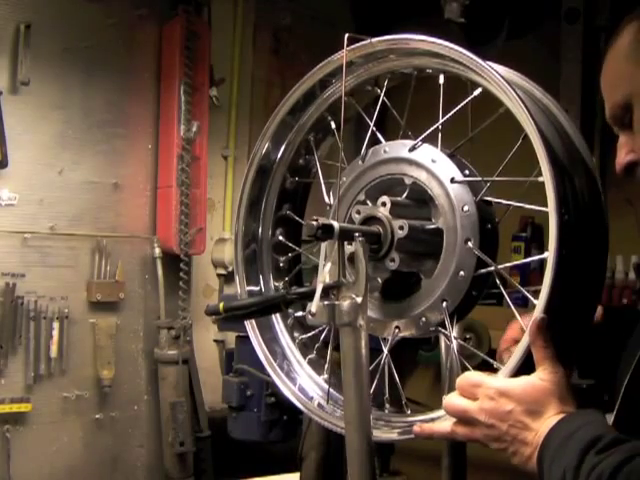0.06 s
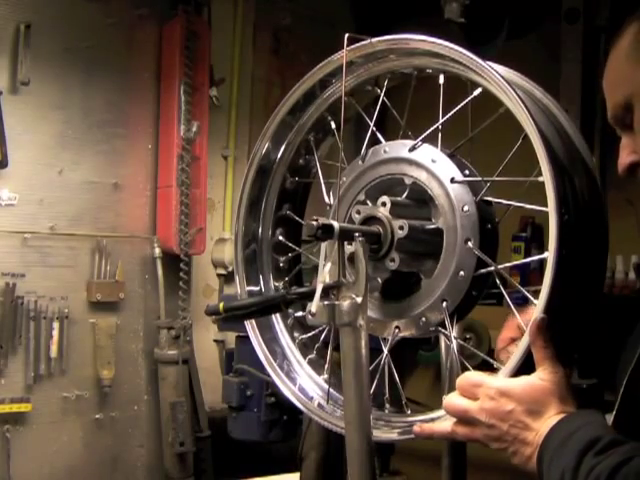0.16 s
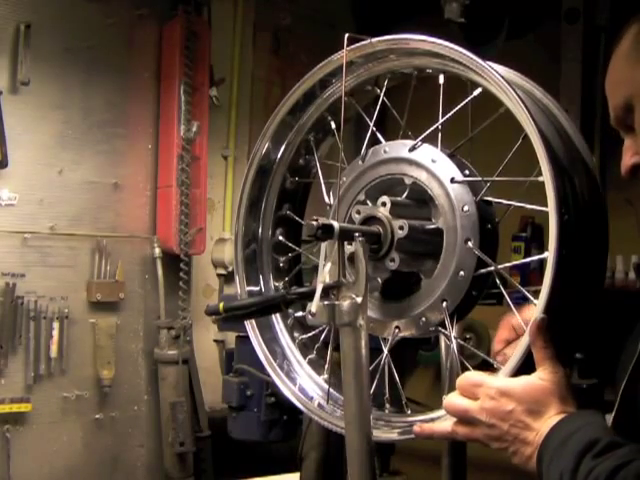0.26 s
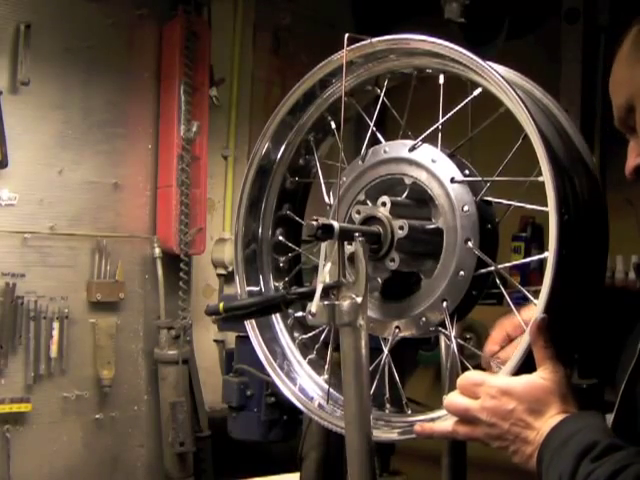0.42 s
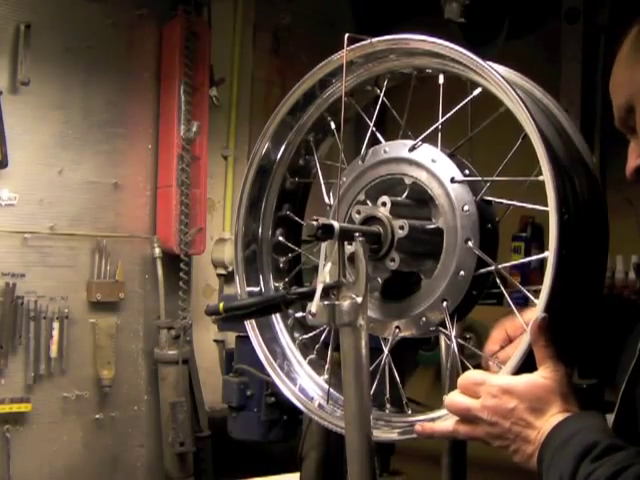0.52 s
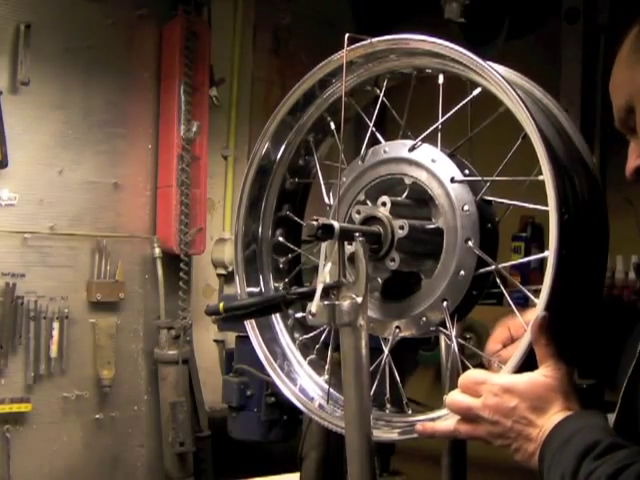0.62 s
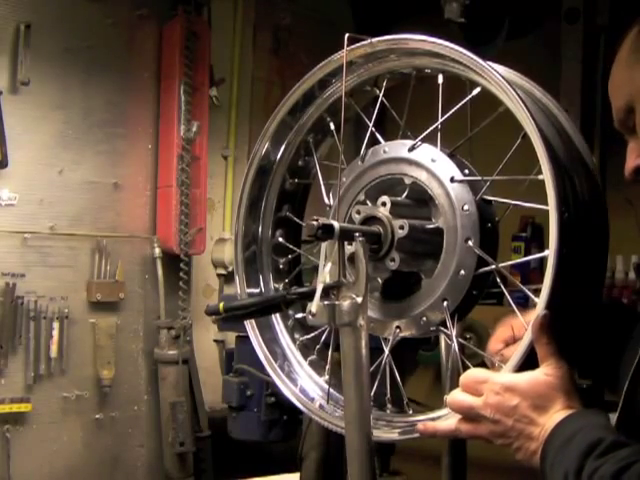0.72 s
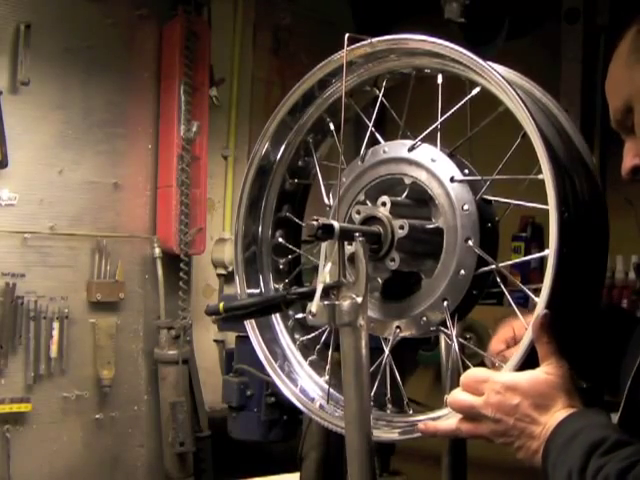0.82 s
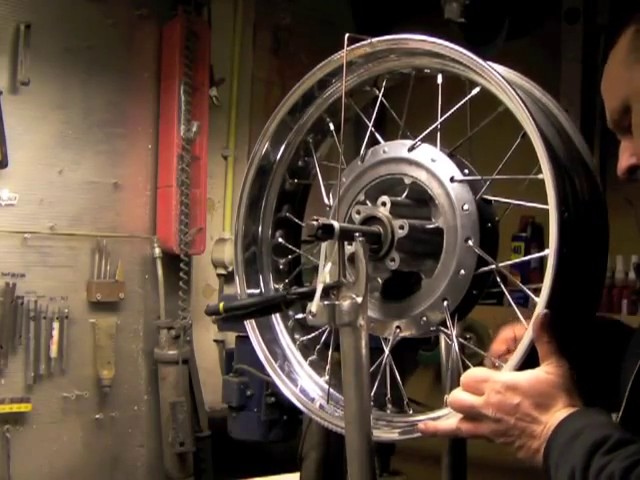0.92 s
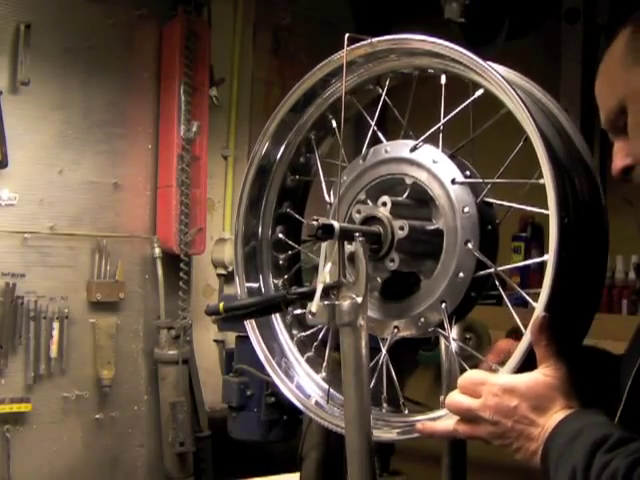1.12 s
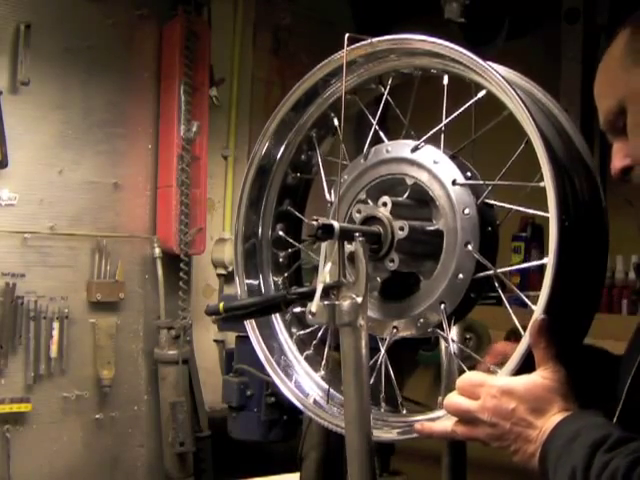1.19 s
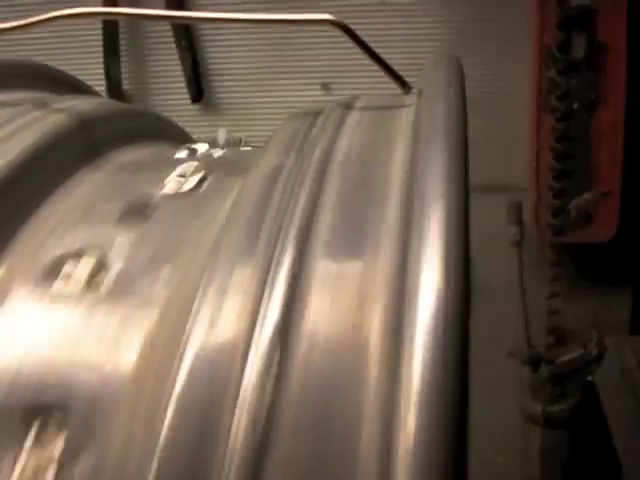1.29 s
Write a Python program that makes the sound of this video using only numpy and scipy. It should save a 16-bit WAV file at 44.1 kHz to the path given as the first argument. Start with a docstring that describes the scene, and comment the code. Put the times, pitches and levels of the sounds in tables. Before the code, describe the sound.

Small steel wrench knocks hard on a metal wheel rim, then rattles lightly against the spokes

```python
"""A quiet workshop where a wire wheel is trued: a small steel wrench knocks hard on the rim once and
rattles lightly on the spokes. Blows ring decaying modes of wrench and wheel; dense modes and contact
are decaying noise bands. A wall clock ticks once a second; the room reverberates and hums over
lumpy bass from outside. Near the end the sound fades out and begins to fade in again."""
import sys
import numpy as np
from scipy import signal
from scipy.fft import rfft, irfft, next_fast_len
from scipy.io import wavfile

SR = 44100
rng = np.random.default_rng(int(sys.argv[2]) if len(sys.argv) > 2 else 0)


def log_audio(samples):
    """Write samples as a 16-bit WAV file to the path given in sys.argv[1]."""
    # one column per channel
    frames = np.atleast_2d(samples).T
    # limit to full scale, then quantise
    limited = np.clip(frames, -1, 1)
    pcm = np.round(limited * 32767).astype(np.int16)
    wavfile.write(sys.argv[1], SR, pcm)


def ratio_of_db(decibels):
    """Turn decibels (scalar or array-like) into linear amplitude factors; 0 dB maps to 1."""
    return 10 ** (np.asarray(decibels, float) / 20)


N = 59535

# left-right phase difference of modes and noise bands: f/Hz, phase/rad
PHASE_APART = [(1000, .15), (2500, 0.17), (5000, 0.54), (9000, 1.3), (14000, 1.5)]


def rms_one(x):
    """Scale to unit rms."""
    return x / np.sqrt(np.mean(x ** 2) + 1e-20)


def at_hz(points, hz):
    """Interpolate a table on a log-frequency axis."""
    table_hz, values = np.transpose(points)
    return np.interp(np.log(hz), np.log(table_hz), values)


def drift(rate_hz):
    """Slow random wander of unit rms: noise through a double pole, at SR / 40."""
    pole = np.exp(-80 * np.pi * rate_hz / SR)
    noise = rng.standard_normal(N // 40 + 2002)
    slow = signal.lfilter([1], [1, -2 * pole, pole * pole], noise)[2000:]   # skip the settling
    return np.interp(np.arange(N) / 40, np.arange(len(slow)), rms_one(slow))


def dying(start_s, t60_s):
    """Silence, then an exponential decay from 1."""
    t = np.arange(N) / SR - start_s
    return (t >= 0) * ratio_of_db(-60 * np.maximum(t, 0) / t60_s)


def strike(modes, times_s, levels_db, contact_s, spread_db):
    """Pulses drive each decaying mode at its own pitch, the drive dying with time constant contact_s."""
    # left minus right level of a mode: f/Hz, level/dB
    side_balance = [(60, -0.5), (130, -2.0), (290, -0.5), (640, 3.5), (1410, 0), (3100, 1.5), (6820, 0.5),
                    (15000, -6)]
    out = np.zeros((2, N))
    hold = np.exp(-1 / (contact_s * SR))
    at = (np.asarray(times_s) * SR).astype(int)
    start = at.min()
    sides = np.array([[.5], [-.5]])
    for hz, db, t60_s in modes:
        end = min(N, at.max() + int(1.5 * t60_s * SR))
        clicks = np.zeros(end - start) + 1e-18
        uneven_db = spread_db * rng.standard_normal(len(at))
        clicks[at - start] = ratio_of_db(np.asarray(levels_db) + db + uneven_db)
        turn = np.exp(2j * np.pi * hz / SR)
        drive = signal.lfilter([1 - hold], [1, -hold * turn], clicks)
        rung = signal.lfilter([1], [1, -ratio_of_db(-60 / (t60_s * SR)) * turn], drive)
        gain = ratio_of_db(at_hz(side_balance, hz) * sides)
        phase = sides * at_hz(PHASE_APART, hz) * rng.choice([-1, 1])
        out[:, start:end] += (rung * gain * np.exp(1j * phase)).imag
    return out


def bands(white, low_hz, count):
    """Split noise between count log-spaced edges, neighbours unrelated: yields centre/Hz and band."""
    edges = np.geomspace(low_hz, 16500, num=count)
    for k, (low, high) in enumerate(zip(edges, edges[1:])):
        sos = signal.butter(2, [low, high], "band", fs=SR, output="sos")
        yield np.sqrt(low * high), signal.sosfilt(sos, white[k % 2])


def wide(spectrum):
    """Stereo noise bands above 541 Hz, wider in the treble, together of rms 1."""
    parts = []
    for hz, (mid, side) in bands(rng.standard_normal((2, 2, N)), low_hz=541.3, count=28):
        half = at_hz(PHASE_APART, hz) / 2
        stereo = np.cos(half) * mid + np.sin(half) * side * [[1], [-1]]
        parts.append((hz, ratio_of_db(at_hz(spectrum, hz)) * stereo))
    total = np.std(sum(band for hz, band in parts))
    return [(hz, band / total) for hz, band in parts]


def knock():
    """Hard rim knock after a faint smeared onset: clear modes over a dense clang dying band by band."""
    # rim modes (low cluster; quickly damped; high): f/Hz, level/dB, t60/s
    rim_low = [(1242, -16, 0.29), (1470.3, -17, .55), (1452.4, -22, 0.9), (1483, -18, 0.25),
               (1524, -14, 0.66), (1579, -15.5, 0.73), (1630, -16.5, .35), (1680, -22.5, 0.058),
               (1752, -14.5, .55)]
    rim_short = [(791, -20, 0.036), (1061, -19, .06), (1652, -6.5, .06), (3020, -7.5, .08),
                 (3371, 5.5, 0.085), (3990, -5, 0.13), (4160, -2, .14), (4280, -8.5, 0.17),
                 (7020, -12.5, .1), (7300, -11, 0.082), (7420, -16, 0.078)]
    rim_high = [(2390, -13.5, .22), (2481, -3.5, .19), (2498, -7.5, 0.25), (2864, -8.5, 0.11),
                (3350, -15, 0.38), (3584, -5, 0.074), (3671, -15.5, .17), (3750, -12.5, 0.27),
                (3826, -8.5, .28), (3890, -10.5, 0.33), (4040, -13.5, 0.18), (4200, 2.5, .15),
                (4284, -10.5, .22), (4374, -8, 0.21), (4500, -20, .2), (4766, -8.5, 0.11),
                (5230, -16.5, .14), (5275, -9.5, 0.17), (5935, -8.5, 0.19), (6500, -27.5, 0.11),
                (6800, -12.5, .14), (7380, -12.5, 0.21), (7350, -16, 0.2), (8420, -18, 0.1165),
                (8400, -22, 0.15), (8880, -21.5, .13), (8950, -23, .1), (9800, -22, 0.11), (9800, -23, 0.1),
                (10780, -23, 0.14), (10300, -18.5, .1), (10560, -11, .09), (10850, -20, 0.1),
                (10700, -24.5, 0.087), (11220, -26, 0.089), (11200, -22.5, 0.063), (11700, -25, 0.093),
                (12760, -32, 0.087)]
    # modes too dense to tell apart: f/Hz, relative density/dB per Hz
    clang_spectrum = [(350, -65.5), (600, -35.5), (1110, -19.5), (1230, -8), (1360, -28.5), (1530, 0.5),
                      (2190, -29.5), (2440, -7), (2720, -12.5), (3330, -8.5), (3610, -11.5), (4260, -7.5),
                      (5590, -15), (5980, -11), (7430, -15.5), (7960, -27), (10900, -13), (14900, -38.5),
                      (15500, -74)]
    # decay of the clang: f/Hz, t60/s
    clang_t60 = [(700, 0.076), (1500, .2), (4000, 0.28), (8000, 0.13), (15000, 0.24)]
    knock_s, knock_db, contact_s, clang_db = .2289, -22, 0.0024, -25.5
    onset_from_s, onset_db, onset_rise_db, onset_clang_db = .2, -46, 14.5, -33
    clear = strike(rim_low + rim_short + rim_high, [knock_s], [knock_db], contact_s, spread_db=0)

    # faint smeared onset before the knock: 20 random rising pulses through the rim modes,
    # and clang noise ramping up
    share = np.sort(rng.random(20))
    pulse_s = onset_from_s + share * (knock_s - onset_from_s)
    pulse_db = onset_db - onset_rise_db * (1 - share)
    onset = strike(rim_low + rim_high, pulse_s, pulse_db, contact_s, spread_db=3.5)
    rising = (np.arange(N) / SR - onset_from_s) / (knock_s - onset_from_s)
    onset_ramp = ratio_of_db(onset_clang_db) * np.clip(rising, 0, 1) * (rising < 1)

    # one rim mode sounds ahead of the knock
    ping = strike(rim_high[1:2], [.207], [-29], contact_s=0.0088, spread_db=2)
    clang = 0
    for hz, band in wide(clang_spectrum):
        decay = ratio_of_db(clang_db) * dying(knock_s, at_hz(clang_t60, hz))
        clang = clang + band * (onset_ramp + decay)
    return clear + onset + ping + clang


def touches():
    """Light touches ring wrench, spoke, nipple and rim, with a short grainy noise of contact."""
    # touches: t/s, wrench level/dB, spoke level/dB, nipple level/dB, rim level/dB
    touch_levels = [(.018, -62.5, -63, -63, -74), (0.377, -47, -54, -63, -66), (0.38, -60, -51, -49.5, -75),
                    (0.4973, -42.5, -74, -45.5, -72), (0.504, -64, -45, -43.5, -74),
                    (.562, -75, -66, -52.5, -69), (.621, -47, -46, -66, -75), (.626, -71, -45, -48.5, -67),
                    (.683, -35.5, -46, -43, -68), (.689, -52, -35.5, -39.5, -63),
                    (.746, -32.5, -68, -53, -70), (.751, -68, -65, -40, -51.5), (0.807, -45, -69, -52, -63),
                    (.813, -68, -44, -42.5, -53.5), (.861, -63, -51, -57, -55), (.971, -57, -52, -57, -67),
                    (1.018, -60, -51.5, -54, -74), (1.128, -55, -54, -53, -73),
                    (1.197, -58, -53, -54, -65.5)]
    # modes of each part, rim only those a light touch reaches; the nipple group also carries the rim's 2331 and
    # 2482 Hz modes, which ring along with it: f/Hz, level/dB, t60/s
    wrench_modes = [(5160, -13.5, 0.052), (5370, -7, .15), (5480, -9.5, .2), (5520, -12, .1),
                    (5596, -4, 0.19), (5740, -6, 0.066), (6200, -28, 0.2), (7484, -6, 0.07),
                    (8456, -10, 0.108), (8465, -11.5, 0.087), (8810, -19.5, 0.16), (9500, -15.5, 0.092),
                    (10350, -24.5, 0.098), (11200, -19.5, .11), (12130, -30, .1)]
    spoke_modes = [(3300, -9, 0.12), (3352, -3.5, 0.25), (3840, -15.5, .12), (3675, -8, .06)]
    nipple_modes = [(1776, -10, 0.074), (1830, -11.5, 0.15), (1891, -4.5, .15), (2331, -9, 0.55),
                    (2482, -11.5, 0.36), (2852, -10.5, 0.23), (3013, -1.5, 0.088), (3042, -11.5, 0.11),
                    (4100, -11.5, 0.11), (4500, -18, 0.089), (4570, -9.5, 0.1), (4600, -15, 0.096)]
    rim_modes = [(1242, -5.5, .3), (1754, 0, 0.54)]
    # contact noise: f/Hz, relative density/dB per Hz
    contact_spectrum = [(1200, -24), (1900, -3.5), (2600, -10.5), (3300, -3), (4500, -3), (5500, -2.5),
                        (6500, -10), (8000, -11.5), (10500, -7), (13000, -13.5), (15500, -16)]
    noise_db, noise_t60_s, noise_rise_s = -10.5, 0.14, .003   # noise_db re the touch's loudest part
    times_s, *levels_db = np.transpose(touch_levels)
    shape = 0
    for t, db in zip(times_s, np.max(levels_db, axis=0)):
        shape = shape + ratio_of_db(db + noise_db) * dying(t, noise_t60_s)
    hold = np.exp(-1 / (noise_rise_s * SR))
    envelope = signal.lfilter([1 - hold], [1, -hold], shape)
    out = envelope * sum(band for hz, band in wide(contact_spectrum))
    for modes, db in zip([wrench_modes, spoke_modes, nipple_modes, rim_modes], levels_db):
        out = out + strike(modes, times_s, db, contact_s=0.0024, spread_db=2)
    return out


def clock():
    """Wall clock: a dull tick every second rings short low modes."""
    # clock modes: f/Hz, level/dB, t60/s
    clock_modes = [(950, -7, 0.049), (1050, 5, .05), (1300, -12.5, .04), (2590, -17, .04)]
    times_s = np.arange(0.03, N / SR, 1)
    return strike(clock_modes, times_s, -55.5 + 0 * times_s, contact_s=0.004, spread_db=1.5)


def workshop(x):
    """Reverberation: eight feedback delays a side, duller on every round."""
    t60_s, wall_cut_hz = 0.26, 9800
    out, size = np.zeros((2, N)), next_fast_len(N + SR)
    w = 2 * np.pi * np.arange(size // 2 + 1) / size   # rad/sample
    dull = 1 / (1 + 1j * w * SR / (2 * np.pi * wall_cut_hz))
    spectrum = rfft(x, size)
    for k, lag in enumerate(rng.uniform(.006, .035, 16) * SR):
        loop = ratio_of_db(-60 * lag / SR / t60_s) * dull * np.exp(-1j * w * lag)
        echoes = irfft(spectrum * loop / (1 - loop), size)[:N]
        out[k % 2] += echoes * (-1) ** (k // 2)
    return out


def air(patchy_db):
    """Room hum and microphone hiss: stereo noise bands whose levels wander separately."""
    # spectrum: f/Hz, relative density/dB per Hz
    air_spectrum = [(25, -21), (60, -14), (130, -6), (190, -7.5), (254, -12.5), (299, -8), (402, -3),
                    (653, -10.5), (1550, -9.5), (2730, -10), (3770, -15), (5960, -13), (7810, -18),
                    (12700, -15.5), (15700, -22)]
    # left-right correlation: f/Hz, correlation/1
    likeness = [(60, 0.2), (240, 0.7), (950, 0.6), (3770, 0.39), (15000, 0.03)]
    out = 0
    for hz, (mid, side) in bands(rng.standard_normal((2, 2, N)), low_hz=26, count=26):
        alike = np.clip(at_hz(likeness, hz), -1, 1)
        stereo = np.sqrt(1 + alike) * mid + np.sqrt(1 - alike) * side * [[1], [-1]]
        out = out + ratio_of_db(at_hz(air_spectrum, hz) + patchy_db * drift(3)) * stereo
    return ratio_of_db(-57.5) * rms_one(out)


def rumble():
    """Lumpy bass from outside the room: band noise under a level curve."""
    # rumble level: t/s, level/dB
    bass_level = [(0.0, -53), (0.012, -79.5), (0.354, -62), (0.402, -81), (0.518, -88), (0.574, -72),
                  (0.664, -78), (0.73, -62.5), (0.898, -87), (0.954, -64.5), (1.068, -76), (1.148, -67),
                  (1.214, -77.5), (1.25, -67)]
    times_s, db = np.transpose(bass_level)
    sos = signal.butter(2, [60, 135], "band", fs=SR, output="sos")   # Hz
    mid, side = signal.sosfilt(sos, rng.standard_normal((2, N)))
    stereo = rms_one(mid + 0.36 * side * [[1], [-1]])
    return ratio_of_db(np.interp(np.arange(N) / SR, times_s, db)) * stereo


def scene():
    """Wheel, wrench and clock in the room, over its hum and the bass from outside."""
    near = knock() + touches() + clock()
    room = ratio_of_db(-20) * workshop(near.mean(axis=0))
    return near + room + air(patchy_db=1.5) + rumble()


def low_pass(x):
    """Removes everything above the highest recorded frequency."""
    return signal.sosfilt(signal.butter(12, 15890, fs=SR, output="sos"), x)


def record(dry):
    """Fade to silence, then start to fade in again."""
    silent_s, fade_out_s, fade_in_s, fade_power = 1.308, .11, 0.15, 1.14
    t = np.arange(N) / SR - silent_s
    ramp = np.where(t < 0, -t / fade_out_s, t / fade_in_s)
    fade = np.clip(ramp, 0, 1) ** fade_power
    return low_pass(dry * fade)


dry = scene()
out = record(dry)
log_audio(out)
```